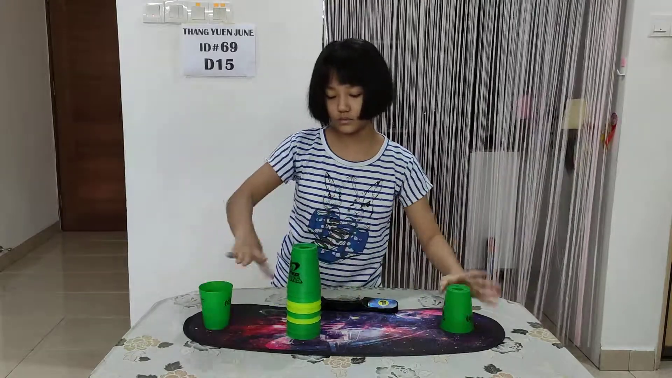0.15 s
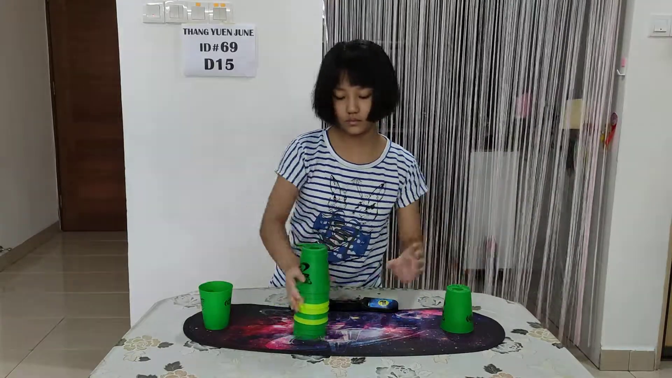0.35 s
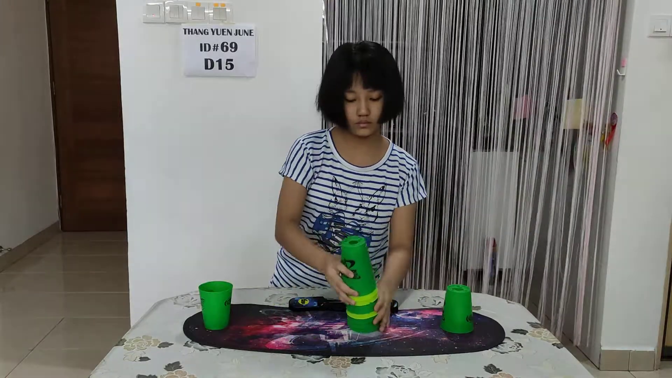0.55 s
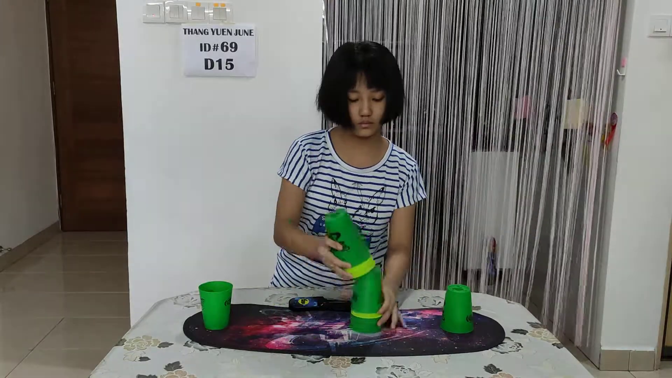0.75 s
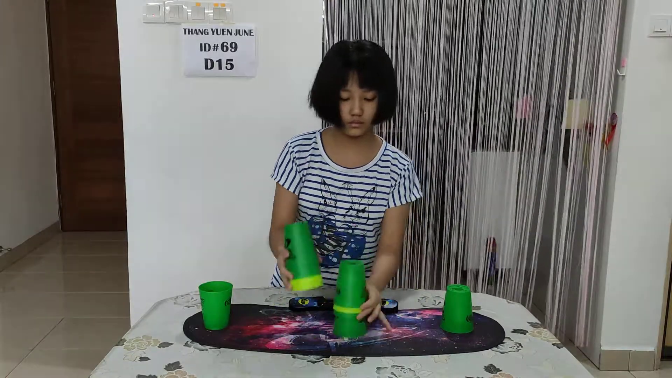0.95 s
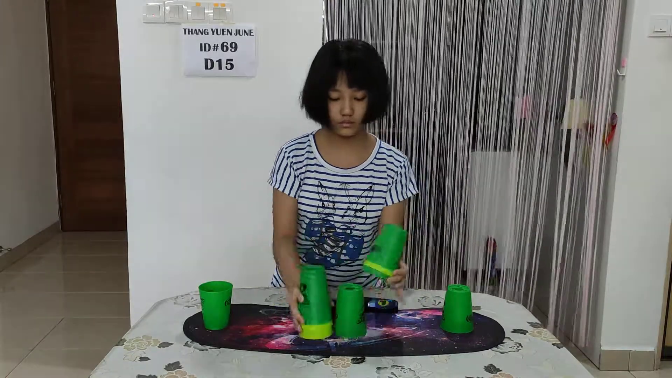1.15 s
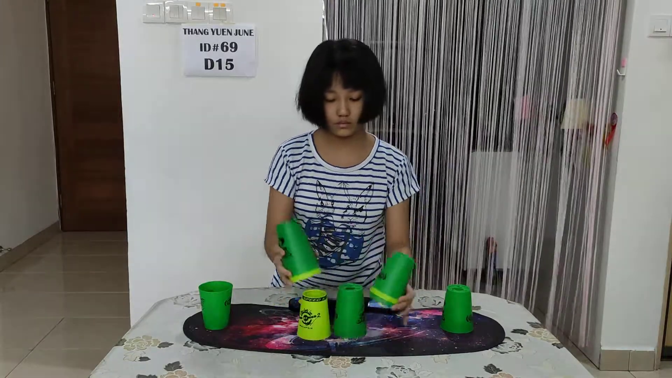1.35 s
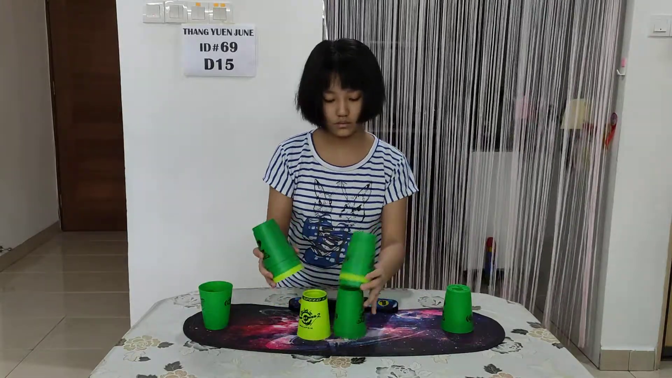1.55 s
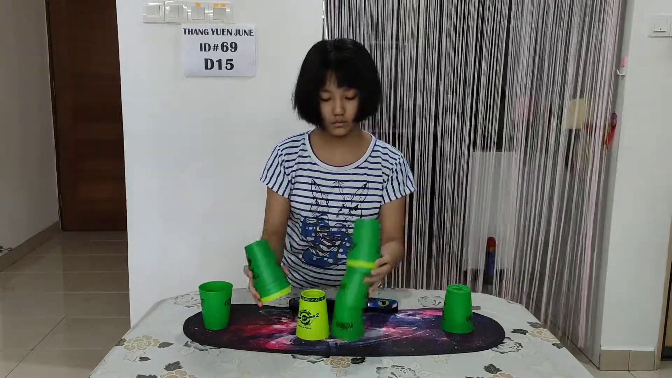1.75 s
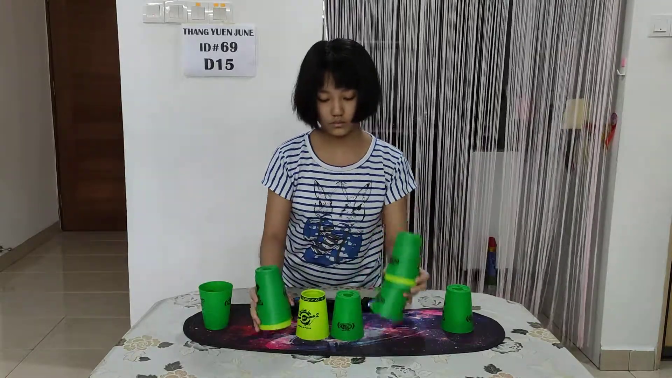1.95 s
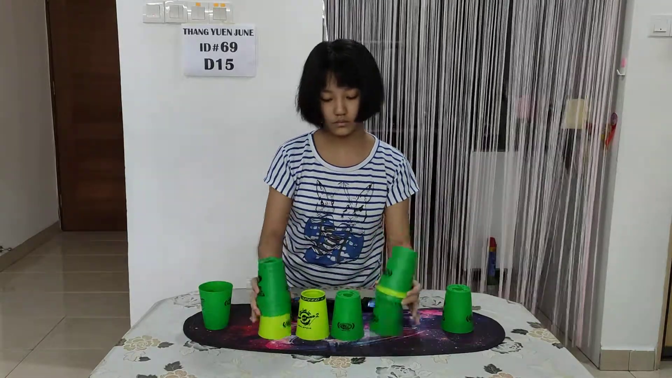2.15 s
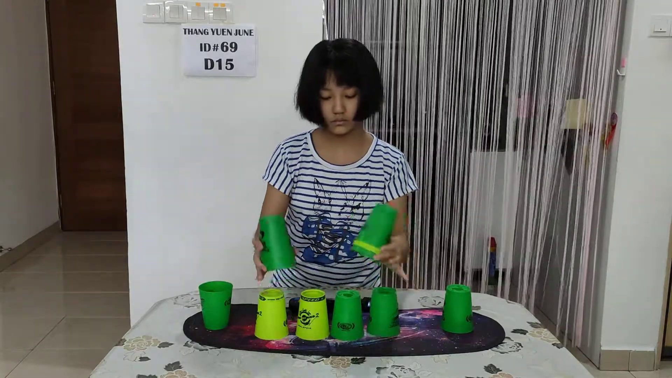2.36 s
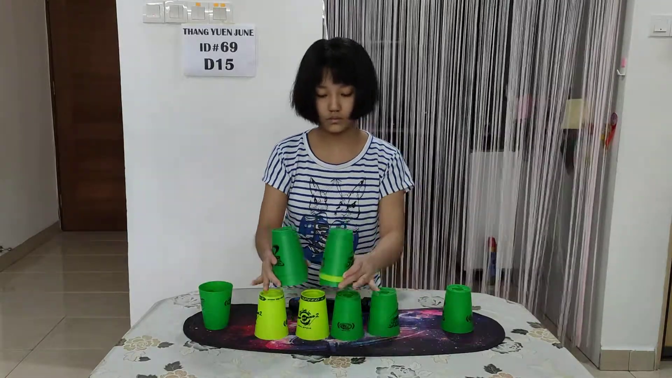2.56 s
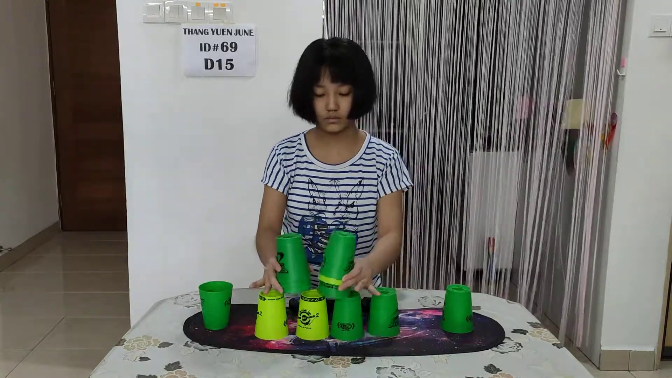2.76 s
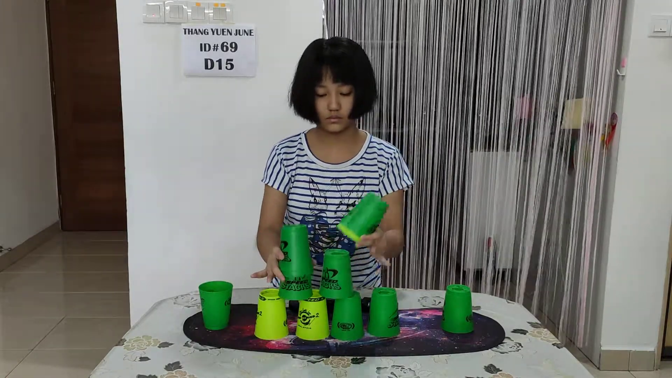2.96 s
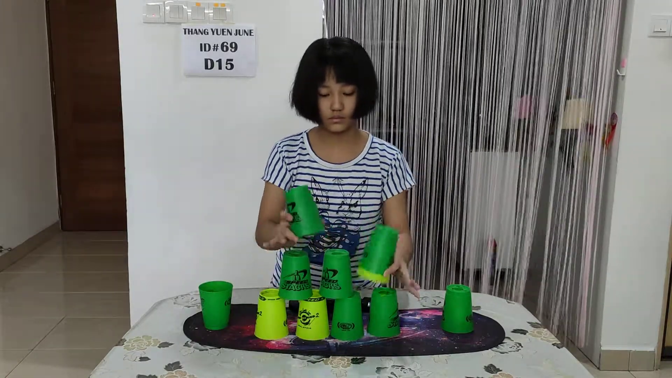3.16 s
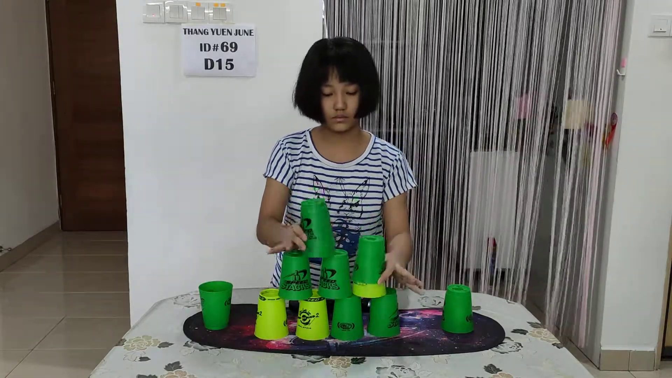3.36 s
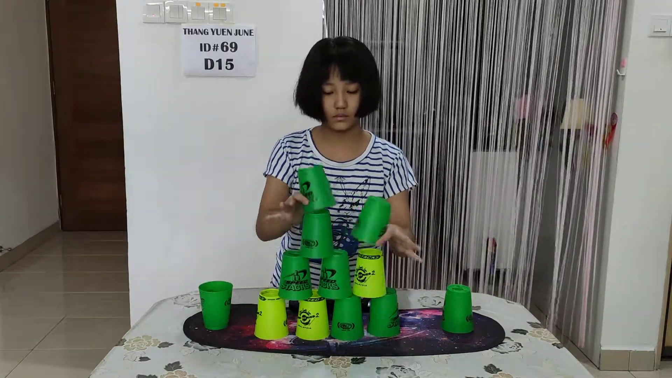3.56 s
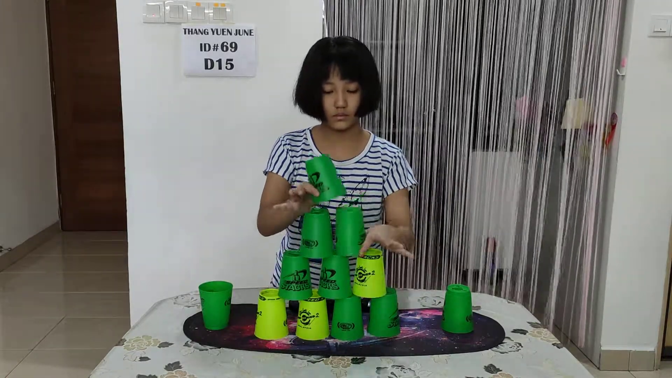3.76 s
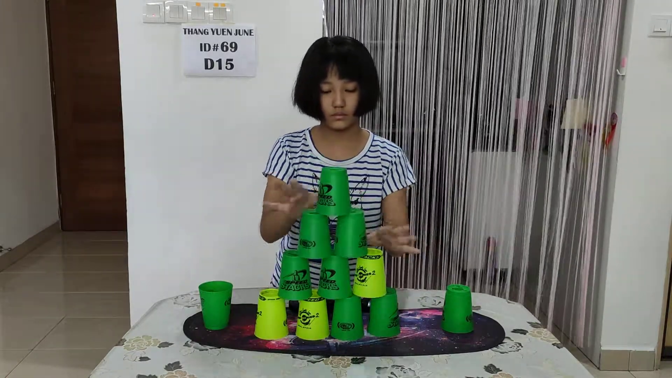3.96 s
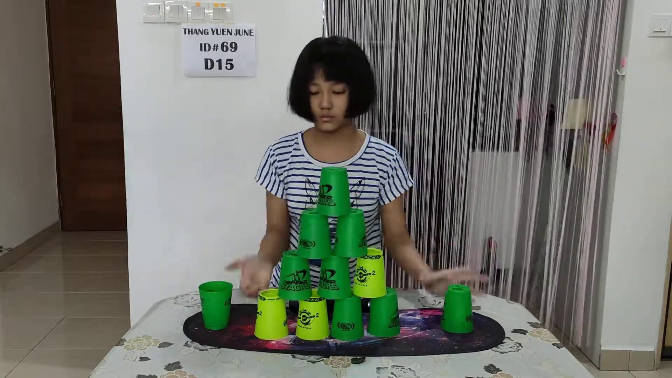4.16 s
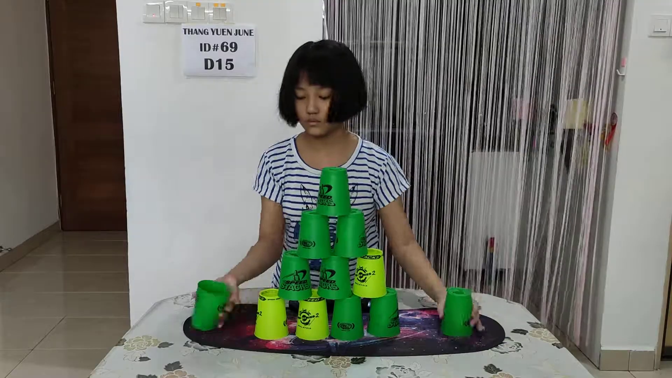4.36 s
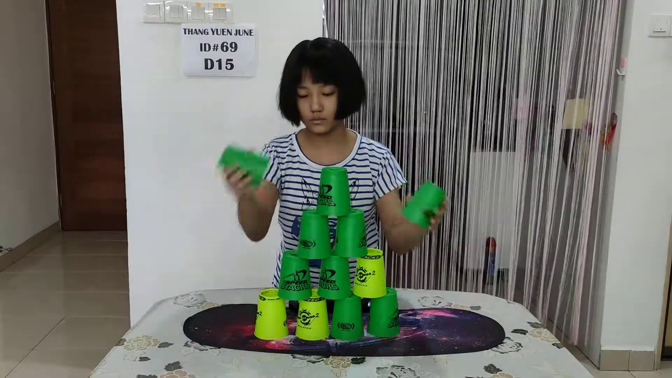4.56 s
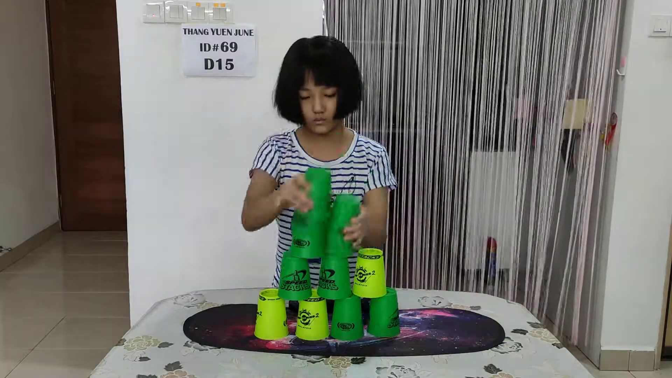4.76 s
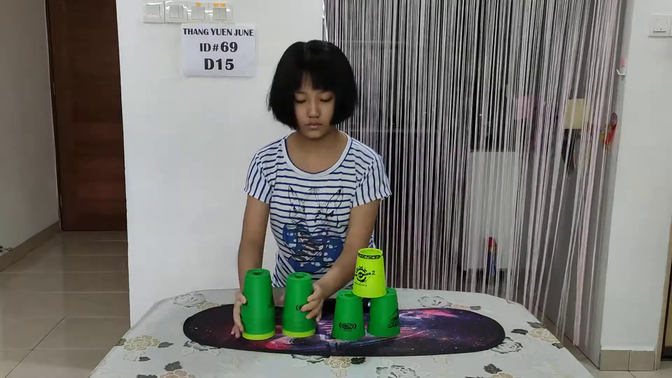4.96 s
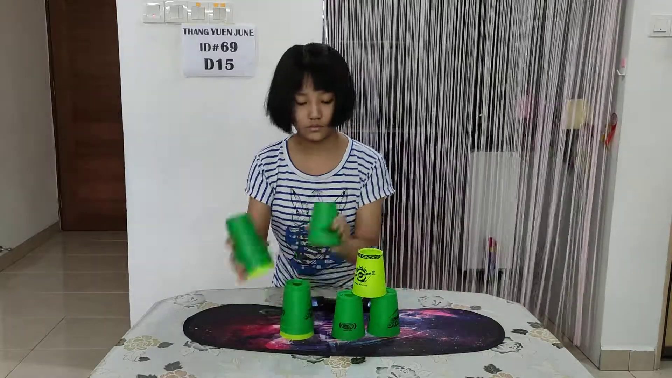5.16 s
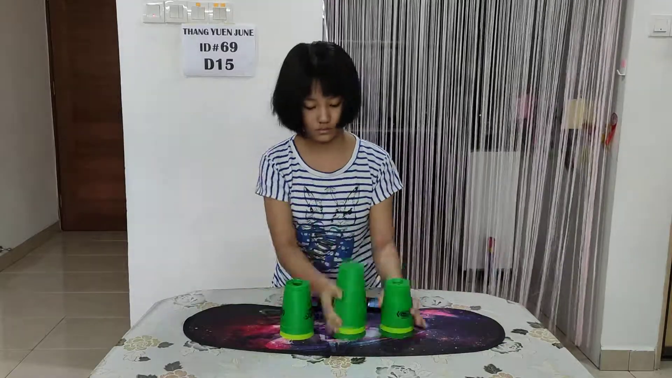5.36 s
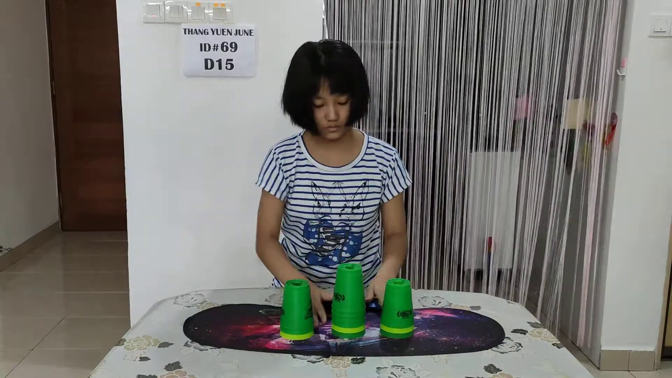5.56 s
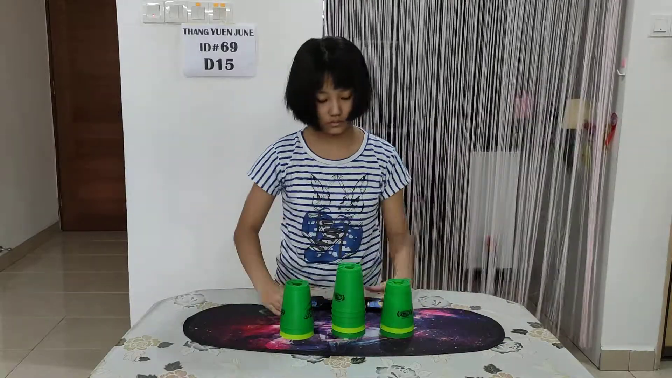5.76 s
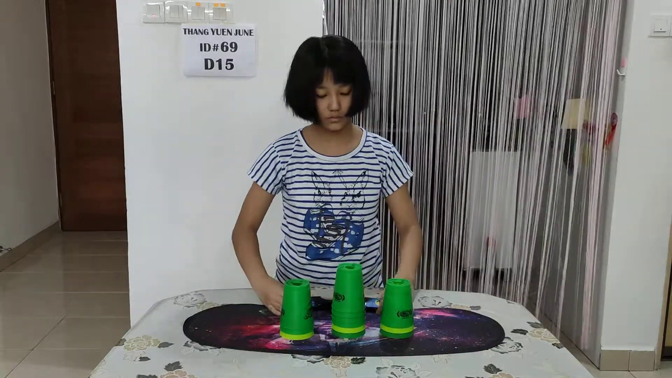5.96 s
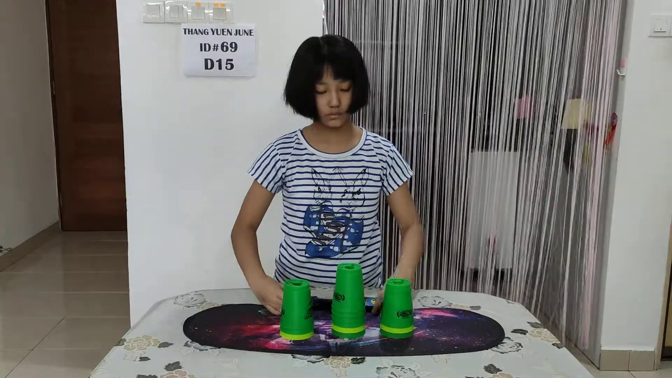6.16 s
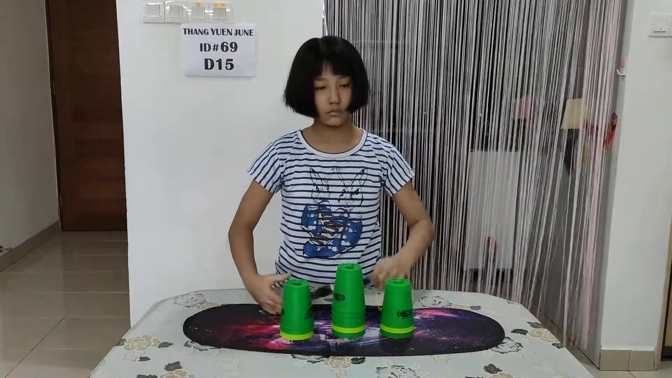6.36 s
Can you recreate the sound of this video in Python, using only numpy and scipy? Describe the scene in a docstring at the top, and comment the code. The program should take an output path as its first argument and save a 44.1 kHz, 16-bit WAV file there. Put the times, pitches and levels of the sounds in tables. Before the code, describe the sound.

Quiet set-downs with small ticks and rubs, cushioned by a mat, lead to a spaced run of hollow, ringing plastic pops as a cup pyramid rises. A short lull follows, then a dense burst of clattering, cups dropping into each other and stacks thumping down, followed by a second small burst and near silence. The hard-floored room adds short bright echoes; the microphones sit a little way off.

```python
"""Plastic cups go softly onto a padded table, then up into a ringing pyramid that is swept back down.
Each contact pops the air in a cup, rings its thin wall and base, clicks its rim and thumps the table.
Nested cups hiss as they slide, made from noise that flutters in tiny slips.
A bare, tiled room answers with echoes, standing waves and a short tail, over its own quiet, steady noise."""
import sys
import numpy as np
from scipy import signal
from scipy.fft import rfft, irfft, next_fast_len
from scipy.io import wavfile

SR = 44100
rng = np.random.default_rng(int(sys.argv[2]) if len(sys.argv) > 2 else 0)


def dump(signal):
    """Clip the signal to [-1, 1] and save it as 16-bit WAV at the path in sys.argv[1]."""
    limited = np.clip(np.atleast_2d(signal).T, -1, 1)
    pcm = np.round(limited * 32767).astype(np.int16)
    wavfile.write(sys.argv[1], SR, pcm)


N = 282240

FREE_BASE_HZ, HELD_BASE_HZ = 1644, 1980  # a gripped or nested base rings higher

# Cups set down on the mat.
# Each row: start in seconds, strength in dB, air pitch in Hz, hardness in dB.
SET_DOWNS = [(0.037, -44.5, 673, -8), (0.05, -38.5, 583, -13.5), (.063, -46, 602, -22),
             (.845, -53.5, 430, -4), (1.213, -48, 610, 2.5), (1.221, -50, 590, 3), (1.656, -48.5, 640, 9.5),
             (1.836, -55, 583, -5), (2.09, -53.5, 422, 6), (2.24, -45, 572, 6.5)]
# Cups placed on the pyramid. Each row: start in seconds, strength in dB, air pitch in Hz,
# tiers above the second, hardness in dB, extra ring of the base below in dB.
PLACINGS = [(2.778, -31, 542, 0.099, -1.5, 1), (2.901, -31, 640, 0, -2, 2), (2.946, -47, 670, 2, 4.5, -9),
            (3.2803, -17.5, 614, 0, 0, -2), (3.437, -30, 644, 1.5, -1.5, -2.5),
            (3.815, -33, 488, 1.9, 3, 1.5), (3.881, -34.5, 666, 2.47, 2, -4),
            (3.897, -35, 620, 2.66, -2, 4), (3.907, -33.5, 486, 2.35, 6.5, 2)]
# How a contact shares its strength. Columns: table, air, side wall, base, rim click, all in dB.
MAT_MIX = (-4, -0.5, -18, -10, -14)  # soft: the mat swallows the click
TIER_MIX = (-20.5, 0, -12.5, -8.5, -14)  # hollow: mostly trapped air
# What each tier upward adds, most of all to the side wall. Same five columns, in dB per tier.
PER_TIER_DB = (0.5, 0, 7, -1.5, 0.5)


def stacking():
    """Cups go onto the mat, then up in tiers; the higher the tier, the more freely the side wall rings."""
    hits = []
    for start, db, air_hz, hardness_db in SET_DOWNS:
        hits += landing(start, MAT_MIX, db, air_hz, HELD_BASE_HZ, hardness_db)
    for start, db, air_hz, tier, hardness_db, base_ring_db in PLACINGS:
        table, air, wall, base, click = np.array(TIER_MIX) + tier * np.array(PER_TIER_DB)
        mix = (table, air, wall, base + base_ring_db, click)
        hits += landing(start, mix, db, air_hz, FREE_BASE_HZ, hardness_db)
    return hits


# Cups glancing off each other as the pyramid is swept down.
# Each row: start in seconds, strength in dB.
GLANCES = [(4.7505, -39), (4.766, -40), (4.785, -38), (4.817, -38), (4.874, -34.5), (5.03, -50),
           (5.3294, -33), (5.348, -33.5)]
# Cups dropping into one another.
# Each row: start in seconds, strength in dB, air pitch in Hz, base pitch in Hz.
NESTINGS = [(4.894, -24.5, 618, 1640), (4.917, -22, 547, 1730), (4.9205, -23, 647, 1820),
            (4.937, -23.5, 604, 2070), (4.962, -25.5, 547, 1670), (4.984, -34, 587, 1980)]
# Nested stacks landing on the table.
# Each row: start in seconds, strength in dB, air pitch in Hz, base pitch in Hz, hardness in dB.
SLAMS = [(4.999, -28, 660, 1878, -3), (5.008, -28, 711, 2095, -4.5), (5.4248, -27, 600, 1700, 5),
         (5.447, -25.5, 658, 1985, -3.5), (5.456, -30.5, 507, 1710, 6)]
# How a contact shares its strength. Columns: table, air, side wall, base, rim click, all in dB.
GLANCE_MIX = (-16, 2, 0.5, -7.5, -1)  # wall against wall
NEST_MIX = (-17, 1, -6.5, -2.5, -7.5)  # air forced out between two cups
SLAM_MIX = (-1, 1, -2, 3.5, -2.5)  # the weight of a stack thumps the table


def sweeping():
    """Cups glance down the pyramid, drop into one another and land on the table as stacks."""
    kinds = [(GLANCE_MIX, GLANCES), (NEST_MIX, NESTINGS), (SLAM_MIX, SLAMS)]
    return [(start, knock(mix, *blow)) for mix, rows in kinds for start, *blow in rows]


# Rims ticking as a cup leaves the stack in the hand. Each row: start in seconds, strength in dB.
TICKS = [(1.648, -50), (1.831, -57), (2.154, -51.5), (2.247, -49.5), (2.525, -57.5)]
# Taps on a cup's base. Each row: start in seconds, strength in dB, base pitch in Hz.
TAPS = [(.741, -62, 1500), (1.191, -59.5, 1590), (5.3801, -26.5, 2045), (6.137, -60.5, 2010),
        (6.317, -50.5, 2270)]
# How a contact shares its strength. Columns: table, air, side wall, base, rim click, all in dB.
TICK_MIX = (-12, -1.5, -8, -13.5, -1)  # light: mostly rim
TAP_MIX = (-27.5, -10, -1.5, 1.5, -3.5)  # a rim striking another cup's base


def handling():
    """Rims tick as cups leave the stack in the hand, and rims tap on other cups' bases."""
    ticks = [(start, knock(TICK_MIX, db)) for start, db in TICKS]
    taps = [(start, knock(TAP_MIX, db, base_hz=base_hz)) for start, db, base_hz in TAPS]
    return ticks + taps


def landing(start, mix, db, air_hz, base_hz, hardness_db):
    """One edge of the rim touches first, then the cup falls flat, weaker but a little harder."""
    edge = knock(mix, db, air_hz, base_hz, hardness_db)
    flat = knock(mix, db - 10, air_hz, base_hz, hardness_db + 1.5)
    return [(start, edge), (start + .0065, flat)]


AIR_HZ, AIR_SPREAD = 634, 0.058  # air pitch where a contact names none; its relative scatter
BASE_SPREAD = .02  # relative scatter of the base pitch
# How far hardness raises each part, in dB per dB. Columns: table, air, side wall, base, rim click.
HARDNESS_SHARE = (0.15, 0, 0.64, 0.3, 0.91)


def knock(mix, db, air_hz=None, base_hz=HELD_BASE_HZ, hardness_db=0):
    """One contact of a given kind; a harder one puts more into the plastic than into the air and table."""
    air_shift, base_shift = rng.standard_normal(2)
    air_hz = air_hz or AIR_HZ * (1 + AIR_SPREAD * air_shift)
    levels = db + np.array(mix) + hardness_db * np.array(HARDNESS_SHARE)
    return contact(air_hz, base_hz * (1 + BASE_SPREAD * base_shift), *levels)


def contact(air_hz, base_hz, table_db, air_db, wall_db, base_db, click_db):
    """Cup contact: the table thumps, the trapped air pops, wall and base clack, the rim clicks."""
    parts = [table_thump(), air_pop(air_hz), wall_clack(), base_clack(base_hz), rim_click()]
    return amp([table_db, air_db, wall_db, base_db, click_db]) @ np.array(parts)


# Modes of the table. Each row: centre pitch in Hz, typical level in dB, decay time t60 in seconds.
TABLE_MODES = [(144, 1, 0.042), (209, -1.5, 0.043), (249.7, -3, 0.057), (335, 4.5, 0.021)]
# What the table top radiates. Each row: frequency in Hz, gain in dB.
TABLE_RADIATION = [(60, -16.5), (100, -11.5), (140, -4), (220, 2), (400, 7), (1000, -24)]


def table_thump():
    """The table's damped modes, as its top radiates them."""
    modes = ring(TABLE_MODES, scatter_db=2.0, detune=0.0055, attack=0.00063)
    return burst(coloured(modes, TABLE_RADIATION))


# Air in and between the cups.
# Each row: multiple of the air pitch, typical level in dB, decay time t60 in seconds.
CAVITY = [(.74, -8, .03), (1.0, 0, .034), (1.15, -8, .022)]
# A small cup radiates little bass. Each row: frequency in Hz, gain in dB.
AIR_RADIATION = [(70, -41), (160, -31.5), (300, -4), (430, 1), (720, 3.5), (1000, 0), (2500, -19.5)]
# Puff of air squeezed out under the rim. Each row: frequency in Hz, relative level in dB per Hz.
PUFF = [(100, -30), (250, -16.5), (400, 3.5), (600, 0.5), (880, -2), (1200, -1.5), (3000, -52)]


def air_pop(air_hz):
    """The air in the cup resonates while a puff escapes under the rim."""
    air = ring(pitched(CAVITY, air_hz), scatter_db=1.5, detune=.012, attack=.0005)
    return burst(burst(coloured(air, AIR_RADIATION)) + amp(-8) * crack(PUFF, t60=0.014))


# Modes of a cup's side wall.
# Each row: centre pitch in Hz, typical level in dB, decay time t60 in seconds.
WALL = [(994, 2.5, 0.079), (1109, 5.5, 0.082), (1217, -0.5, 0.21), (1288, 0, 0.14)]
# Snap of the side wall. Each row: frequency in Hz, relative level in dB per Hz.
WALL_SNAP = [(500, -41.5), (850, 3), (1100, -3), (1300, -10.5), (1500, -10), (2000, -30.5), (5000, -44),
             (12000, -70)]


def wall_clack():
    """The thin side wall snaps and rings."""
    return shell(WALL, WALL_SNAP, snap_t60=0.015, ring_db=-0.5, detune=0.02)


# Modes of a cup's base.
# Each row: multiple of the base pitch, typical level in dB, decay time t60 in seconds.
BASE = [(.96, -5, .04), (1.0, 0, .045), (1.05, -5, .04), (1.27, -13, .02)]
# Snap of the base. Each row: frequency in Hz, relative level in dB per Hz.
BASE_SNAP = [(800, -41.5), (1400, -1.5), (1700, -1.5), (2100, -1), (2600, -7), (4000, -14.5), (9000, -76)]


def base_clack(base_hz):
    """The base snaps and rings around its own pitch."""
    return shell(pitched(BASE, base_hz), BASE_SNAP, snap_t60=.012, ring_db=0, detune=.008)


# Snap of the rim. Each row: frequency in Hz, relative level in dB per Hz.
RIM_SNAP = [(900, -42), (2300, -5), (3200, -1.5), (4400, 0.5), (6000, -1.5), (7100, -0.5), (8500, -11),
            (11000, -19.5), (15500, -33)]


def rim_click():
    """The rim gives a bright click that chatters."""
    return chatter(crack(RIM_SNAP, t60=0.023), gap=.0016, again_db=-0.5)


def chatter(x, gap, again_db):
    """A rim never lands flat: it touches twice more within a few milliseconds."""
    out = x.copy()
    delays = np.cumsum(gap * rng.uniform(.5, 2.2, 2))
    for delay, db in zip(delays, rng.normal(again_db, 0.87, 2)):
        add(out, delay, amp(db) * x)
    return burst(out)


def shell(modes, snap, snap_t60, ring_db, detune):
    """One region of the plastic: a dry snap and a short ring."""
    ringing = ring(modes, scatter_db=-1, detune=detune, attack=0.00021)
    return burst(crack(snap, snap_t60) + amp(ring_db) * ringing)


T = np.arange(round(.12 * SR)) / SR  # time axis of one contact, in seconds


def ring(modes, scatter_db, detune, attack):
    """Damped modes; each contact gives slightly other strengths and pitches."""
    hz, db, t60 = np.transpose(modes)[:, :, None]
    strength, shift, sign = rng.standard_normal((3, len(modes), 1))
    waves = np.sign(sign) * np.sin(2 * np.pi * hz * (1 + detune * shift) * T)
    decay = amp(db + scatter_db * strength - 60 * T / t60)
    return burst(np.sum(waves * decay, 0) * (1 - np.exp(-T / attack)))


def crack(spectrum, t60):
    """Many dense, heavily damped modes, made as a few milliseconds of coloured noise."""
    return burst(coloured(rng.standard_normal(len(T)) * amp(-60 * T / t60), spectrum))


def pitched(modes, pitch_hz):
    """Put modes given as multiples on a pitch."""
    return [(pitch_hz * multiple, db, t60) for multiple, db, t60 in modes]


# Colour of the sliding plastic. Each row: frequency in Hz, relative level in dB per Hz.
HISS = [(70, -15), (300, 2.5), (1200, 2.5), (3000, -2.5), (6800, 1.5), (8500, -6), (11000, -13.5),
        (15500, -30)]


def slide(length, db):
    """Ribbed plastic rubs in tiny slips that swell and fade."""
    n = round(max(length, .005) * SR)
    noise = rng.standard_normal(n)
    # a new random slip strength every millisecond
    slip_db = 5 * np.repeat(rng.standard_normal(n), round(SR / 1000))[:n]
    return amp(db) * unit(coloured(noise * amp(slip_db), HISS)) * np.sqrt(np.hanning(n))


# Cup sliding on cup.
# Each row: start in seconds, length in seconds, level in dB before its fades and the room.
SLIDES = [(1.104, 0.024, -56), (1.335, 0.012, -59.5), (1.653, 0.019, -49), (1.777, 0.037, -61),
          (1.926, 0.066, -57.5), (2.44, 0.036, -61.5), (2.539, 0.027, -57), (2.994, 0.05, -57.5),
          (3.719, 0.015, -56.5), (4.396, 0.046, -61), (4.768, 0.12, -44.5), (4.937, 0.11, -34),
          (5.441, 0.019, -44), (6.039, 0.016, -57.5), (6.231, 0.063, -59.5)]


def cups():
    """Every contact and every slide, as heard in the room."""
    track = np.zeros((2, N))
    for start, hit in handling() + stacking() + sweeping():
        add(track, start, room(hit, wet_db=0.5, build_up=0.00057, echo_db=-1, modes_db=-52.5))
    for start, length, db in SLIDES:
        rub = slide(length, db)
        add(track, start, room(rub, wet_db=0, build_up=0.005, echo_db=-0.5, modes_db=-60))
    return track * amp([[-.3], [.3]])  # leans slightly right


# Decay of the room's tail. Each row: frequency in Hz, decay time t60 in seconds.
ROOM_DECAY = [(100, 0.28), (260, 0.36), (700, 0.52), (1840, 0.54), (4850, 0.52), (8000, 0.45), (13000, 0.4)]
# Echoes off the walls. Each row: mean delay in seconds, relative strength as a gain.
ECHOES = [(.0045, 0.36), (.0098, 0.24), (0.0152, 0.67), (0.031, 0.15), (.042, 0.17), (.068, 0.063)]
# Standing waves of the room.
# Each row: pitch in Hz, relative level in dB, decay time t60 in seconds.
ROOM_MODES = [(137, -6.5, 0.49), (209.8, 0, 0.35), (333.6, -7, 0.56), (400, -1, 0.15), (494, -7.5, 0.61),
              (621, -8, 0.25), (719, -5, 0.33)]


def room(x, wet_db, build_up, echo_db, modes_db):
    """Direct sound, wall echoes, standing waves and a tail that is new for each position of the cup."""
    hz, frames, bins = signal.stft(diffuse(size=24576), SR, nperseg=256)
    fading = bins * amp(-60 * frames / along(ROOM_DECAY, hz)[:, None])
    tail = signal.istft(fading, SR, nperseg=256)[1]
    t = np.arange(tail.shape[1]) / SR
    tail *= 1 - np.exp(-t / build_up)
    response = amp(wet_db) * tail / np.linalg.norm(tail[0])
    # a cup off centre reaches one microphone up to two samples earlier, and a little louder
    side = rng.normal(0.81, 1.0)
    lag = np.clip(np.round([side, -side]), 0, 2).astype(int)
    response[[0, 1], lag] += amp(np.array([-side, side]) * 0.21)
    for delay, strength in ECHOES:
        # delays scatter with the cup's position and between the microphones
        arrival = np.abs(delay + .0004 * rng.standard_normal() + .00015 * rng.standard_normal(2))
        response[[0, 1], np.round(arrival * SR).astype(int)] += amp(echo_db) * strength
    for mode_hz, db, t60 in ROOM_MODES:
        wave = np.cos(2 * np.pi * (mode_hz * t + rng.random()))
        response += amp(modes_db + db - 60 * t / t60) * wave
    return signal.fftconvolve(x[None], response, axes=1)


# Colour of the room noise. Each row: frequency in Hz, relative level in dB per Hz.
AMBIENT = [(15, -10.5), (28, -4.5), (60, -10.5), (105, -11), (160, -6), (310, 1.5), (420, -5), (620, -3.5),
           (950, -8.5), (2200, -13), (5200, -22.5), (6800, -18), (9000, -28.5), (15500, -34.5)]


def ambience():
    """Steady low rush of the room with a faint hiss on top, as shaped noise from all sides."""
    return amp(-58.0) * unit(coloured(diffuse(size=N), AMBIENT))


# Diffuse sound at two microphones.
# Each row: frequency in Hz, left-right likeness as a correlation from -1 to 1.
ALIKE = [(60, 0.96), (130, 0.94), (290, 0.94), (640, 0.34), (1410, -0.34), (3100, 0.17), (15000, -0.11)]


def diffuse(size):
    """White noise from all sides: closely alike at both microphones in the bass only."""
    turn = np.arccos(np.clip(along(ALIKE, np.fft.rfftfreq(size, 1 / SR)), -1, 1)) / 2
    mid, side = rfft(rng.standard_normal((2, size))) * [np.cos(turn), np.sin(turn)]
    return irfft([mid + side, mid - side], size)


def coloured(x, spectrum):
    """Causal minimum-phase filter with the given (Hz, dB) spectrum."""
    n = x.shape[-1]
    m = 2 * next_fast_len(n)
    cepstrum = irfft(np.log(amp(along(spectrum, np.fft.rfftfreq(m, 1 / SR)))), m)
    # fold the cepstrum forward in time so that nothing sounds before its cause
    cepstrum[1:m // 2] *= 2
    cepstrum[m // 2 + 1:] = 0
    return irfft(rfft(x, m) * np.exp(rfft(cepstrum)), m)[..., :n]


def along(points, hz):
    """Read (Hz, value) points on a log axis."""
    f, v = np.transpose(points)
    return np.interp(np.log(hz + 1), np.log(f + 1), v)


def amp(db):
    """Decibels to gain."""
    return 10 ** (np.asarray(db) / 20)


def unit(x):
    """Scale to rms 1."""
    return x / np.sqrt(np.mean(x ** 2) + 1e-20)


def burst(x):
    """Scale to the energy of 10 ms at rms 1."""
    return x / np.sqrt(np.sum(x ** 2) * 100 / SR + 1e-20)


def add(track, start, x):
    """Mix x into the track from the start time in seconds on."""
    part = track[..., max(round(start * SR), 0):][..., :x.shape[-1]]
    part += x[..., :part.shape[-1]]


def scene():
    """Cups over the room noise."""
    return cups() + ambience()


TOP_HZ = 15830  # band limit


def record(dry):
    """Cut everything from the band limit up, with zero padding against wrap-around."""
    m = next_fast_len(N + SR // 2)
    return irfft(rfft(dry, m) * (np.fft.rfftfreq(m, 1 / SR) < TOP_HZ), m)[:, :N]


dry = scene()
out = record(dry)
dump(out)
```